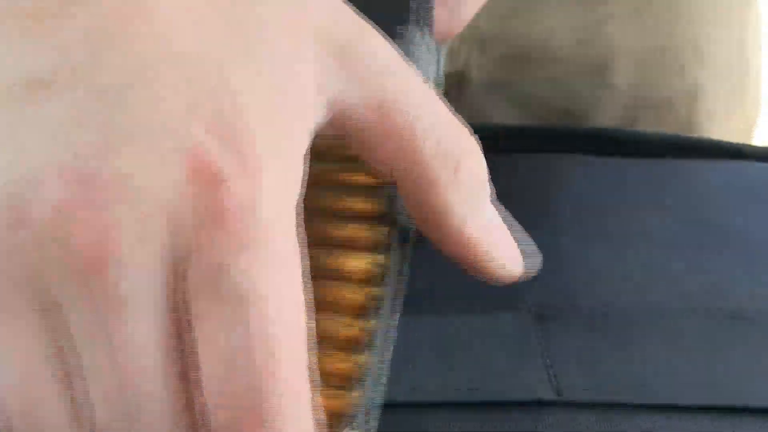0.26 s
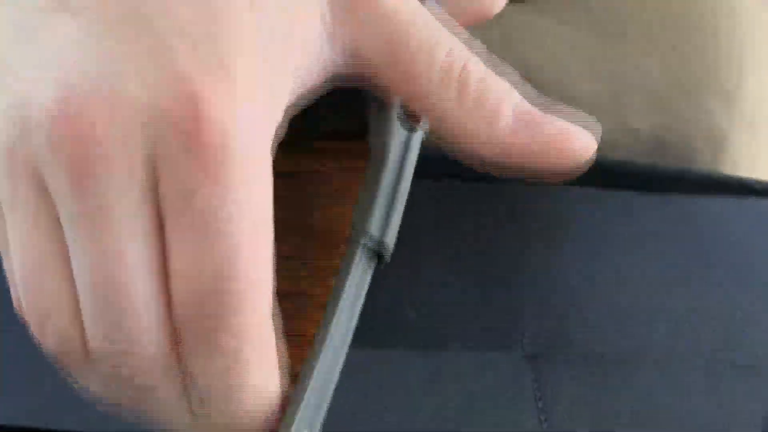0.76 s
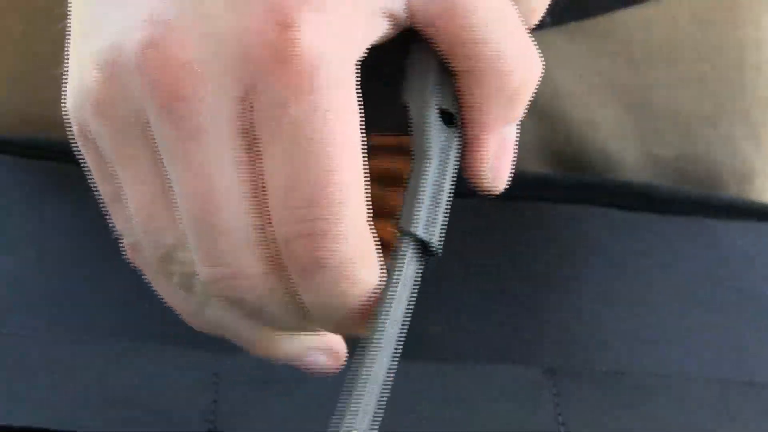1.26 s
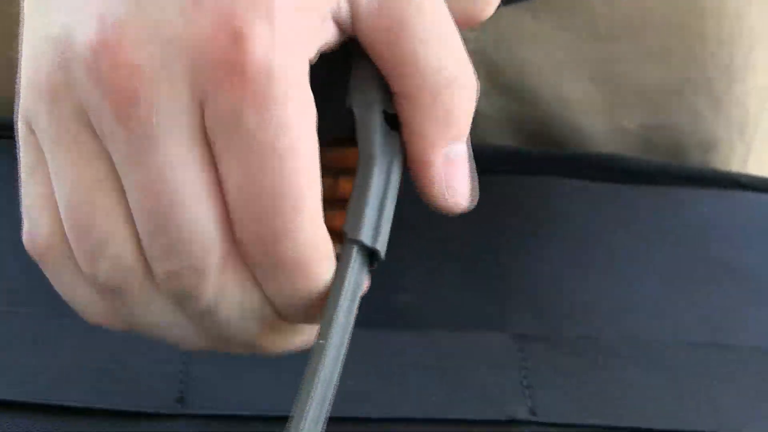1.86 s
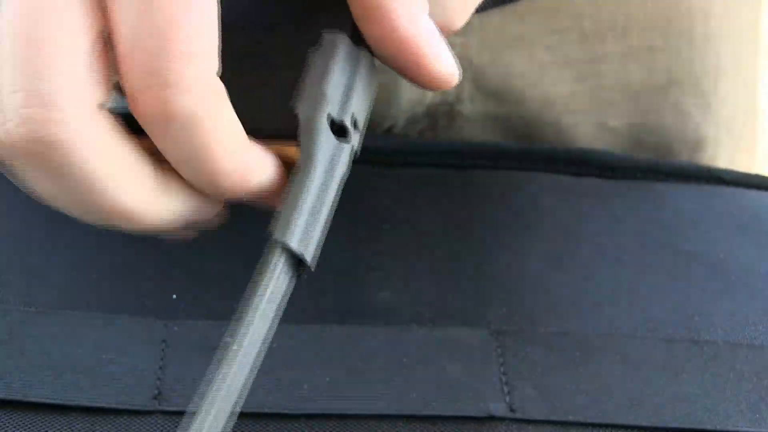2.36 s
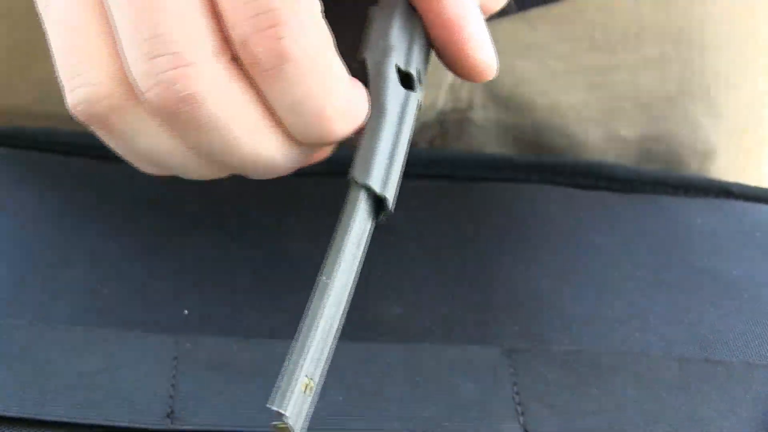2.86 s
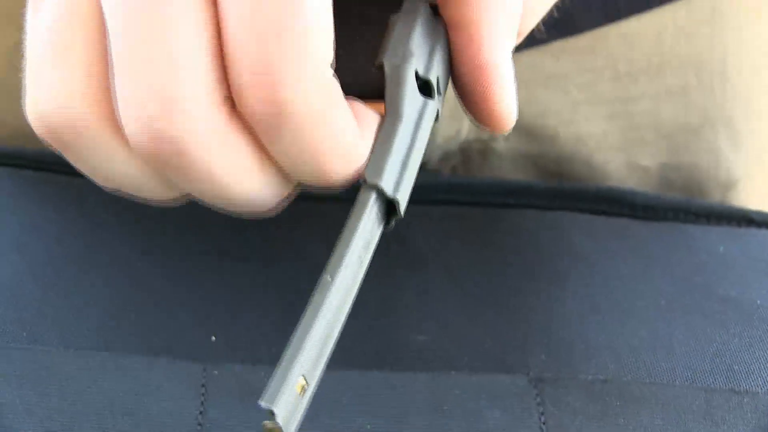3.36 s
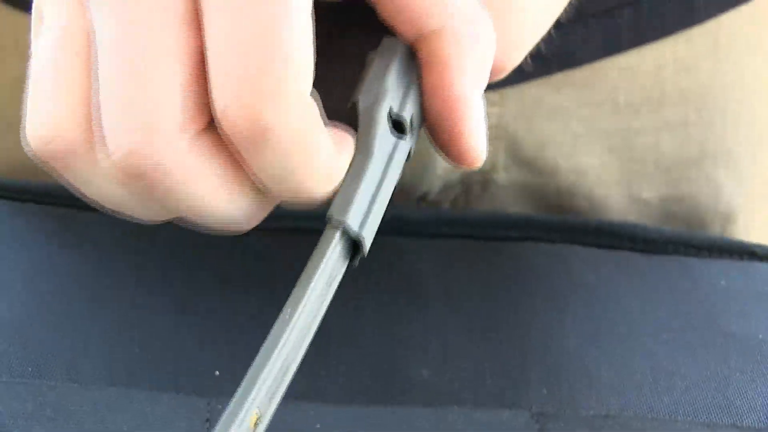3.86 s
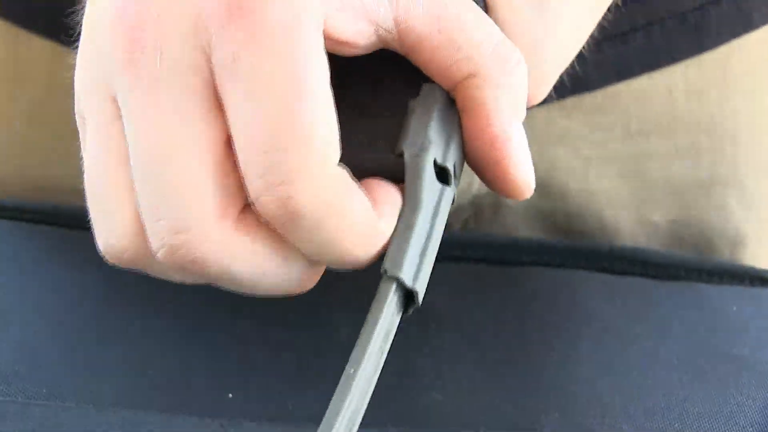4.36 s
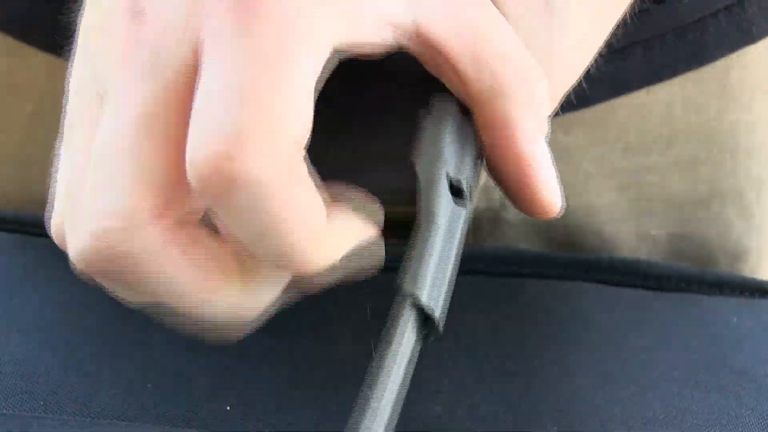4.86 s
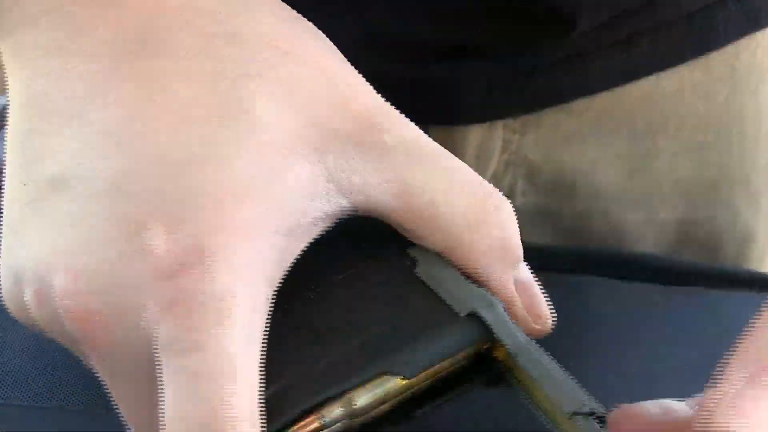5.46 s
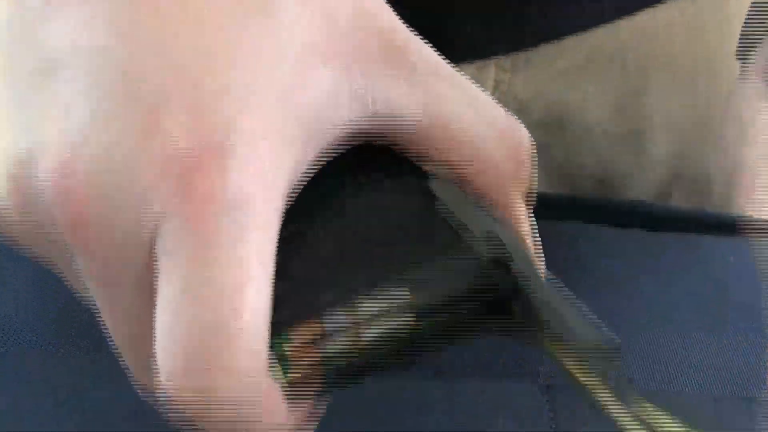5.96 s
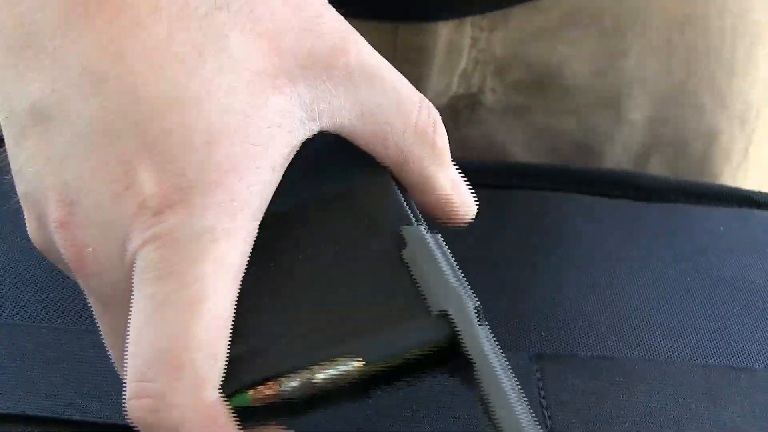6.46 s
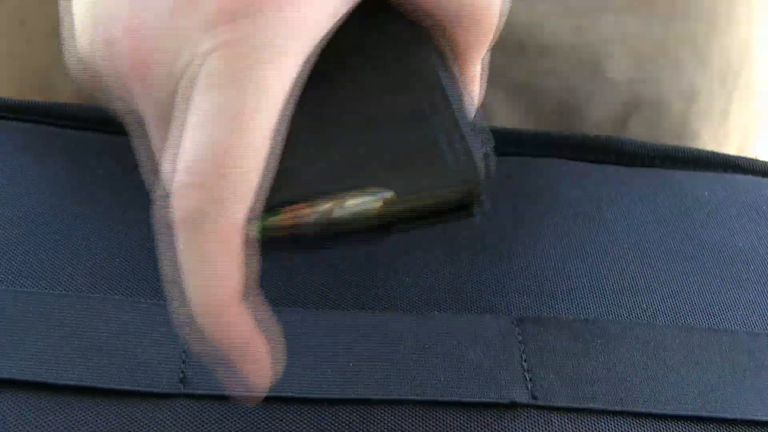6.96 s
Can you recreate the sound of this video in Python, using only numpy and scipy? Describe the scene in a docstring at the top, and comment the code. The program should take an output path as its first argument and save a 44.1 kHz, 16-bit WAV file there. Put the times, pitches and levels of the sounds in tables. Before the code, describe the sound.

Cartridges are pressed from a metal strip into a hollow plastic magazine, right by the microphone outdoors. Soft rubbing gives way to rapid hard clatter, then irregular snaps with small rattles, a brief spring creak and low padded knocks. It nearly falls silent, two strong clacks return, and the strip comes away with lighter clicks and scuffs. Thin bird whistles and light wind stay far behind, with no echo.

```python
"""First a faint tap and a rustle of skin and cloth, then hard clatters: outdoors, close to a camcorder's microphones,
brass cartridges are thumbed off a steel strip into a plastic magazine. Each slip is a burst of tiny random impacts
ringing the modes of shell, cases and hollow body. Filtered noise makes the rustle; a spring creaks in short ringing
slips, the magazine thumps a padded bag in low decaying tones. Far off, gliding tones make birds; shaped noise makes
light wind and microphone hiss."""
import sys
import numpy as np
from scipy import signal
from scipy.fft import rfft, irfft
from scipy.io import wavfile
from scipy.ndimage import uniform_filter1d

SR = 44100
rng = np.random.default_rng(int(sys.argv[2]) if len(sys.argv) > 2 else 0)


def file_out(sig):
    """Save sig as 16-bit WAV at sys.argv[1]."""
    # one column per channel
    cols = np.atleast_2d(sig).T
    # limit, then scale
    lim = np.clip(cols, -1, 1)
    pcm = np.round(lim * 32767).astype(np.int16)
    wavfile.write(sys.argv[1], SR, pcm)


N = 317520  # samples, 7.2 s


def undb(db):
    """Level in dB to amplitude."""
    return 10 ** (np.asarray(db) / 20)


def unit(x):
    """Scale to an RMS of 1."""
    return x / np.sqrt(np.mean(x ** 2))


def on_log(table, hz):
    """Read a spectrum between its points, along log frequency."""
    f, db = np.transpose(table)
    return np.interp(np.log(hz + 1), np.log(f), db)


def colour(x, gain):
    """Shape the spectrum of a full-length signal."""
    return irfft(rfft(x) * gain, N)


def walk(rate):
    """Random levels held 1 / rate s and smoothed twice, with an RMS of 1."""
    hold = int(SR / rate)
    steps = np.repeat(rng.standard_normal(N // hold + 1), hold)
    smooth = uniform_filter1d(uniform_filter1d(steps, hold), hold)
    return unit(smooth[:N])


def add(out, s, sound):
    """Mix a stereo sound in at s seconds."""
    i = int(s * SR)
    out[:, i:i + sound.shape[1]] += sound[:, :N - i]


def ring(modes, t, scatter_db=1.5, detune=0.029, crack_db=-22.0, tilt_db=0.):
    """Response to one tap: decaying modes, whose levels and pitches the grip shifts a little each time."""
    hz, db, t60 = np.array(modes).T[:, :, None]
    db = db + tilt_db * np.log2(hz / hz[0])  # tilt per octave above the first mode
    grip = rng.standard_normal((2, len(modes), 1))
    decay = np.exp(-np.log(1000) * t / t60)
    wave = np.sin(2 * np.pi * hz * (1 + detune * grip[0]) * t) * decay
    sign = (-1.) ** np.arange(len(modes))[:, None]
    strength = undb(db + scatter_db * grip[1]) / np.sqrt(t60)
    tap = np.sum(sign * strength * wave, axis=0)
    tap[0] += undb(crack_db) * np.sqrt(np.sum(tap ** 2))  # the bare crack of the contact
    # a small object radiates little outside the range of its modes
    edges = [.85 * hz.min(), min(1.15 * hz.max(), .45 * SR)]
    return signal.sosfilt(signal.butter(2, edges, "bandpass", fs=SR, output="sos"), tap)


# cartridge slips, close: (t/s, level/dB, hollow body level/dB and brass level/dB relative to it, fall by 40 dB/ms)
SLIPS = [(0.0403, -52.5, 2.5, 5, 46), (0.3977, -45, 4, 2.5, 16), (0.435, -50.5, -15, 0, 20),
         (0.451, -53, -15, -3, 10), (0.547, -51.5, -10, -12, 14), (0.668, -43.5, 0, 1, 9),
         (0.7483, -37.5, 5, 1, 15), (0.76, -25.5, -21, -2.5, 23), (0.7704, -16, -10.5, -4, 15),
         (0.7799, -11, -13, -3, 12), (0.7923, -17, -14.5, -7.5, 32), (0.7978, -8.5, -22.5, -3, 16.4),
         (0.8686, -40.5, -10, -10.5, 12), (0.8895, -39.5, -9.5, 0.5, 23), (0.9134, -23, -5.5, 1, 74),
         (0.9172, -10.5, -21, 0.5, 23), (0.942, -7.5, -26.5, -2, 10), (0.9622, -13.5, -15, 1, 20),
         (0.9805, -29, -25, -20.5, 45), (1.034, -22, -22, -9.5, 37), (1.039, -31, -2, -8.5, 13),
         (1.045, -29, -18.5, 4.5, 6.3), (1.0704, -37.5, -14.5, 5, 4.7), (1.0885, -7, -25.5, 1.5, 11.8),
         (1.1963, -49, -18, -12, 31), (1.2226, -45.5, -10, -25, 19), (1.5147, -55, -1, -18, 11),
         (1.5463, -33, -17.5, -7, 8.5), (1.5694, -18, -11.5, -12, 12.2), (1.5914, -38.5, 2.5, 6, 31),
         (1.611, -40.5, -12.5, -13.5, 11), (1.7232, -57, -14, 5, 13), (1.8211, -46, -5, -20, 3.7),
         (1.845, -48, -6, -14, 8), (1.9007, -15.5, -13, -6, 6.6), (1.989, -48, -14, -5, 12),
         (2.017, -26, -4.5, -1.5, 11), (2.027, -26, -15, -9, 20), (2.0493, -8.5, -24.5, 3.5, 8.1),
         (2.0556, -21.5, -6.5, -7.5, 35), (2.069, -8, -22.5, -5, 2.6), (2.079, -18.5, -16.5, 0.5, 44),
         (2.1696, -45.5, -1, -6, 47), (2.188, -43.5, -4, -10, 15), (2.237, -56, 9, -6, 11),
         (2.3002, -47.5, 4, -18, 12), (2.33, -21.5, 0.5, -9.5, 38), (2.337, -23, -8, 1, 10),
         (2.3482, -33, -22, -19, 5.3), (2.3632, -40, -7, -13.5, 12), (2.825, -40.5, 7.5, -17, 25),
         (2.8364, -19, -54, -14, 14), (2.845, -33, 9, -8.5, 9.4), (2.8486, -15, -14, -6.5, 17),
         (2.866, -32.5, -27.5, -14.5, 12), (2.983, -38.5, -11, -3, 8.9), (3.2329, -38, -23.5, -11, 4.2),
         (3.2656, -28.5, -3, -8.5, 120), (3.277, -13.5, -7.5, -7, 9.5), (3.3028, -26.5, -9.5, -10, 26),
         (3.3068, -22.5, -8, -8.5, 9.2), (3.3153, -30.5, -18, -2.5, 14), (3.357, -51.5, 0, 3, 22),
         (3.522, -37, -5, -12, 61), (3.5415, -12.5, -6.5, 1, 25.5), (3.547, -13, -12.5, -9.5, 6.1),
         (3.606, -43, -16, -9.5, 73), (3.6566, -55, -14, -10, 9.9), (3.675, -45.5, -24, 7, 7.5),
         (3.7018, -44, -4.5, -9, 15), (3.7175, -39.5, -5.5, -6, 16), (3.7283, -47.5, -3, -10, 5.8),
         (3.7404, -51, -3, -17, 38), (3.7546, -52.5, -14, -9, 5.5), (3.7928, -58.5, -5, -7, 3.7),
         (3.8671, -52, 2, 10, 13), (3.8752, -53.5, 1, 1, 9.3), (3.897, -59, -10, -6, 34),
         (3.9706, -58, 1, -9, 16), (3.9873, -62, 12, -1, 10.8), (4.158, -61.5, -10, -4, 8),
         (4.265, -64.5, -9, -8, 12), (4.3339, -59, 0, -3, 15), (4.572, -53.5, 1, -6, 28),
         (4.6942, -48.5, 1, -24, 23), (4.7578, -19, -16.5, -5, 7), (4.7639, -10, -14.5, 4, 13.5),
         (4.776, -24.5, -39, -11, 38), (4.7985, -39, -37, -11, 37), (4.8784, -40.5, -9, -21, 42),
         (4.9094, -37, -9, -15, 4), (4.9333, -20.5, -7, -4.5, 12), (4.9448, -12, -14.5, 2.5, 16),
         (4.9546, -24, -23, -12, 36), (4.9802, -36, -13, -0.5, 36), (5.347, -41.5, -28, -5.5, 8.9),
         (5.6337, -55, -1.5, 2.5, 90), (6.0687, -49, -15, 2, 65), (6.0816, -14.5, -18.5, 5, 18.4),
         (6.094, -32, -22, 13, 32), (6.1239, -34.5, 0, 11.5, 15), (6.278, -50.5, -25, -2, 15),
         (6.4077, -58, -7, -7.5, 20), (6.5108, -59, -8, 18, 3.6), (6.5332, -44, 12, 1, 27),
         (6.627, -62, 16, 2, 9), (6.96, -22, -3.5, 6.5, 13.6), (6.976, -52, -29, -16, 23)]
# the grip frees or damps the lower shell: (t/s, level/dB)
GRIP_ON_SHELL = [(0., -0.5), (1.05, -2.5), (1.2, 2.5), (1.57, 4), (1.9, -4.5), (2.1, 2), (2.33, 4),
                 (2.85, 0), (3.0, -7), (3.3, -2.5), (3.55, 5.5), (3.68, -2), (3.75, 5.5), (4.7, -0.5),
                 (4.95, -1.), (5.35, -14.5), (6.08, 2.), (6.28, -11), (6.5, 4.5), (6.96, 13.5)]
# modes of the hollow body, lower shell, upper shell and brass cases: (f/Hz, level/dB, t60/s)
HOLLOW_MODES = [(340, -19.5, 0.019), (424.6, 4.5, 0.016), (534, 8, 0.0067), (635.3, 6.5, 0.019)]
SHELL_LOW_MODES = [(942, -9, 0.011), (1246, -1, 0.012), (1280, -0.5, 0.012), (1620, 0, .012),
                   (1728, -2, 0.017), (1904, -3.5, .012)]
SHELL_HIGH_MODES = [(2117, -3.5, 0.0098), (2680, 1.5, 0.0066), (2718, 0.5, 0.0078), (3033, -3, 0.0077),
                    (3490, -4, 0.0076), (3810, -4.5, .008), (4305, -4.5, .008)]
BRASS_MODES = [(4476, 1.5, 0.0063), (4974, 1, 0.0045), (5760, 1, 0.0037), (6497, 1.5, 0.0038),
               (6906, 1, 0.0052), (7806, -4.5, 0.0091), (8270, -10, 0.005), (8680, -9, 0.035),
               (9270, -8.5, 0.0029), (10990, -8, 0.001), (13700, -20, 0.004)]
# harder slips build up longer and favour the upper shell: value at 0 dB, and change per dB of level
RISE_MS, RISE_MS_PER_DB = 2.4, 0.09  # a third of the build-up
LOW_SHELL_DB, LOW_SHELL_PER_DB = -5.5, -0.1673


def clicks(side_db=-12.5, rattle_db=-19.0, rattle_s=0.071, spread_db=6.0, swell_db=15.5, snap_db=19.5,
           lead_db=17.5, jolt_db=-45.5, jolt_s=.006, dulling=0.3):
    """Every slip: a clatter of impacts that swells, dies fast and leaves a faint rattle of loose cases."""
    out, t = np.zeros((2, N)), np.arange(int(SR / 8)) / SR
    for s, db, hollow_db, brass_db, t40_ms in SLIPS:
        rise = max(RISE_MS + RISE_MS_PER_DB * db, .2) / 1000
        build_s = 3 * rise
        low_db = LOW_SHELL_DB + LOW_SHELL_PER_DB * db + np.interp(s, *np.transpose(GRIP_ON_SHELL))
        after = np.maximum(t - build_s, 0)  # seconds since the landing
        before = np.minimum(t / build_s, 1) - 1  # -1 at the start, 0 from the landing on
        clatter = np.exp(-np.log(100) * after / (t40_ms / 1000))
        rattle = undb(rattle_db) * np.exp(-np.log(100) * after / rattle_s)
        push = undb(swell_db * before) * (clatter + rattle)
        # impacts differ widely in force; the second row reaches the two microphone ports unalike
        force = undb(spread_db * rng.standard_normal(len(t)))
        taps = push * rng.standard_normal((2, len(t))) * force
        taps[:, int(build_s * SR)] = undb(lead_db)  # the landing itself, set strong
        hard = taps * undb(snap_db * before)  # metal meets metal only at the end of the slip
        # (impacts, modes, level/dB, extra side level/dB): short waves differ more between the ports
        parts = ((hard, SHELL_HIGH_MODES, 0, 0), (taps, HOLLOW_MODES, hollow_db, -4.),
                 (taps, SHELL_LOW_MODES, low_db, -1.5), (hard, BRASS_MODES, brass_db, 2.5))
        sound = 0
        for drive, modes, part_db, apart_db in parts:
            # a part that is struck more softly loses its top modes first
            response = ring(modes, t[:len(t) // 3], tilt_db=dulling * min(part_db, 0))
            part = signal.fftconvolve(drive, response[None], axes=1)
            power = uniform_filter1d(part ** 2, SR // 500, axis=1)  # over 2 ms
            loudest = np.sqrt(power.max(axis=1, keepdims=True))
            part = undb(db + part_db) * part / loudest
            sound = sound + part[0] + undb(side_db + apart_db) * np.outer([1, -1], part[1])
        # the blow also shakes the bag and the camera as a dull jolt
        x = after / jolt_s
        sound[:, :len(t)] += undb(db + jolt_db) * x * np.exp(1 - x) * np.cos(x)
        add(out, s - 2.5 * rise, sound)
    return out


# creaks of the magazine spring: (t/s, peak level/dB)
SPRING_CREAKS = [(3.0303, -32), (3.05, -32), (3.068, -28.5), (3.0825, -27.5), (3.1054, -32), (3.1153, -48),
                 (3.121, -46)]
# modes of the spring: (f/Hz, level/dB, t60/s)
SPRING_MODES = [(533, -9, 0.0081), (1020, -12, 0.0061), (1680, -5.5, 0.013), (3320, -3.5, .006),
                (3690, -2, .006), (5370, -17.5, 0.0044), (6890, -19.5, .004)]


def creaks(slip_s=.0007):
    """A coil sticks and lets go: one short, rough slip rings the same few modes each time."""
    out, t = np.zeros((2, N)), np.arange(SR // 30) / SR
    for s, db in SPRING_CREAKS:
        roughness = 1 + 0.55 * rng.standard_normal(len(t))
        slip = roughness * rng.standard_normal(len(t)) * np.exp(-t / slip_s)
        tick = signal.fftconvolve(slip, ring(SPRING_MODES, t, detune=0.006, crack_db=-18))
        add(out, s, undb(db) * np.outer([1, 1], tick / np.abs(tick).max()))
    return out


# thumps on the padded bag: (t/s, peak level/dB, f/Hz, t60/s)
BAG_BUMPS = [(0.454, -43, 230, 0.053), (0.51, -40, 340, 0.024), (0.665, -38.5, 393, 0.089),
             (1.263, -39.5, 287, 0.039), (1.279, -36, 284, 0.038), (1.299, -43.5, 301, 0.086),
             (1.434, -33, 289, 0.028), (1.448, -34, 287, 0.032), (1.464, -35, 288, 0.035),
             (1.525, -29, 244, 0.013), (1.586, -24, 402, 0.032), (2.334, -22.5, 378, 0.04),
             (3.307, -23.5, 423, 0.024), (3.872, -45, 136, 0.025), (4.945, -15.5, 432, 0.013),
             (6.124, -31, 171, 0.022), (6.537, -17, 272, 0.02), (6.549, -42, 147, 0.022),
             (6.583, -36.5, 175, 0.091), (6.626, -26.5, 240, 0.045), (6.654, -37, 172, 0.043),
             (6.677, -29, 180, 0.025)]


def bumps(push_s=0.0021):
    """The magazine and knuckles thump the padded bag: a soft push into one low, short mode."""
    out, t = np.zeros((2, N)), np.arange(SR // 10) / SR
    for s, db, hz, t60 in BAG_BUMPS:
        decay = np.exp(-np.log(1000) * t / t60)
        thump = np.sin(2 * np.pi * hz * t) * decay * (1 - np.exp(-t / push_s))
        add(out, s, -undb(db) * np.outer([1, 1], thump / np.abs(thump).max()))
    return out


# hands resting and shifting on cloth and plastic: (t/s, level/dB, tilt from band to band/dB)
HAND_RUB = [(0.0, -63.5, 1.8), (0.15, -49.5, 2), (0.5, -59, -1.1), (0.75, -55.5, -2.4), (0.95, -57.5, -0.5),
            (1.12, -43.5, 1.5), (1.22, -60, -2.5), (1.8, -63.5, -1), (2.2, -54.5, -1), (2.6, -67, -1),
            (3.501, -61.5, -2), (4.4, -71.5, -4), (4.88, -57.5, 1.2), (5.12, -61, -0.8), (5.37, -57.5, .4),
            (5.7, -69.5, -1.1), (6.2, -60, -1.5), (7.2, -65.5, -2)]
# short drags of skin or brass: (fullest t/s, length/s, level/dB, tilt from band to band/dB)
SHORT_DRAGS = [(0.197, 0.069, -50, 8.5), (0.246, .085, -50.5, 7), (0.516, 0.09, -51.5, -2),
               (0.682, 0.096, -59, -7), (0.909, 0.072, -40.5, -1.8), (1.022, .044, -44.5, 0),
               (1.217, 0.037, -55, -6.), (1.286, 0.055, -65, -20), (1.388, 0.059, -66.5, 11.5),
               (1.453, 0.046, -48.5, -11.5), (1.532, 0.12, -51.5, -7.5), (1.592, 0.13, -41.5, -4.3),
               (1.76, 0.061, -74.5, 17), (1.9, 0.092, -50.5, -4.5), (2.013, 0.049, -52, -2),
               (2.12, 0.057, -46, 2), (2.331, 0.041, -52, 1), (2.565, 0.073, -57, -1),
               (2.885, 0.04, -47, -3), (3.013, 0.036, -56.5, -1.5), (3.269, 0.034, -43, -1),
               (3.592, 0.051, -55, 0), (3.609, .04, -54, -4.5), (4.022, 0.04, -58.5, 7),
               (4.921, 0.064, -37.5, -2), (5.184, 0.14, -59, 5.), (5.332, 0.14, -70.5, 14.5),
               (5.459, 0.095, -52, 8), (5.943, 0.054, -63, 0), (6.15, 0.035, -59, 7),
               (6.496, .075, -48.5, -9.5), (6.502, 0.065, -54.5, 9.5), (6.557, 0.095, -53.5, -9),
               (6.812, 0.075, -50.5, 0.5), (6.855, 0.081, -54, 2.5), (6.962, 0.066, -37, 6.5),
               (6.98, 0.066, -50, 2), (7.167, 0.37, -57, 1.5)]
# friction bands: (low f/Hz, high f/Hz, level of the resting rub/dB)
FRICTION_BANDS = [(107, 760, -1.5), (860, 2070, -3), (2000, 4280, -1.5), (4420, 22000, -1.5)]
# spectrum of skin friction: (f/Hz, level/dB per Hz)
SKIN_SPECTRUM = [(59, -31.5), (100, -10.5), (302, -3.5), (768, -6), (930, -1), (1760, -5), (2690, -6.5),
                 (4770, -11.5), (7610, -17), (13800, -30), (16000, -36.5)]
SCUFF_RISE, SCUFF_ARCH_DB = 0.53, 7  # share of the length; how far the outer bands fall below the middle ones
CRACKLE = 1.2  # extra force of a catch


def rub(grain_db=0.5, flutter_db=2.5, side_db=-10.5):
    """Skin drags over cloth and plastic: grainy friction whose colour follows the hands."""
    s, rest_db, rest_tilt_db = np.transpose(HAND_RUB)
    t, hz, out = np.arange(N) / SR, np.arange(N // 2 + 1) * SR / N, 0
    grit = undb(grain_db * walk(900) + 2.0 * walk(150))
    grit = grit * (1 + CRACKLE * np.maximum(walk(420) - 1.5, 0))  # ridges of skin catch now and then
    for k, (lo_hz, hi_hz, band_db) in enumerate(FRICTION_BANDS):
        place = k - 3 / 2  # bands above the middle
        band = undb(on_log(SKIN_SPECTRUM, hz)) / (1 + (lo_hz / (hz + 1)) ** 6) / (1 + (hz / hi_hz) ** 6)
        mid, side = (unit(colour(grit * rng.standard_normal(N), band)) for _ in range(2))
        force = undb(np.interp(t, s, rest_db + place * rest_tilt_db + band_db))
        for full, length, db, tilt_db in SHORT_DRAGS:
            rise, fall = SCUFF_RISE * length, (1 - SCUFF_RISE) * length
            span = slice(int((full - rise) * SR), int((full + fall) * SR))
            drag_db = db + place * tilt_db - SCUFF_ARCH_DB * place ** 2 / 2
            force[span] += undb(drag_db) * np.interp(t[span] - full, [-rise, 0, fall], [0, 1, 0])
        stereo = mid + undb(side_db) * np.outer([1, -1], side)
        out = out + force * undb(flutter_db * walk(45)) * stereo
    return out


# far whistles: (t/s, length/s, start f/Hz, end f/Hz, level/dB, trill depth 0-1, hoarseness as RMS pitch wander/Hz)
BIRD_CALLS = [(2.771, .06, 2890, 2930, -61.5, 0.07, 30), (3.445, .025, 2910, 3300, -58.5, 0.1, 40),
              (3.454, 0.038, 3320, 2900, -61, 0., 40), (3.823, 0.027, 3650, 4500, -60, 0., 56),
              (3.885, 0.04, 3500, 4550, -62, 0.1, 63), (4.978, 0.27, 5120, 5060, -56.5, 0.1, 9),
              (5.545, 0.034, 5740, 4840, -55, 0.3, 69), (5.63, 0.14, 5200, 5100, -58.5, 0.74, 63),
              (5.725, 0.13, 5080, 5050, -55, 0.7, 46), (5.905, 0.19, 5050, 1900, -58, 0.2, 138),
              (5.99, 0.11, 4600, 3860, -57, 0.3, 49), (6.31, 0.056, 4550, 3500, -60, 0.2, 70),
              (6.58, 0.085, 3200, 2530, -51.5, 0.3, 74), (6.653, 0.045, 2570, 3390, -55.5, 0.3, 105),
              (6.683, 0.062, 3240, 2700, -53, 0.1, 116), (6.705, 0.027, 1580, 2540, -51.5, 0.15, 58),
              (7.068, 0.046, 11300, 10000, -64, 0., 60), (7.077, 0.093, 13400, 11800, -70.5, 0., 80)]


def birds(trill_hz=126.0, flick_hz=500.):
    """Far whistles: gliding tones blurred by the air; a trill is a row of quick upward flicks."""
    out = np.zeros((2, N))
    waver, flicker = walk(990), undb(3. * walk(110))
    for start, length, hz0, hz1, db, trill, hoarse_hz in BIRD_CALLS:
        i, n = int(start * SR), int(length * SR)
        beat = trill_hz * np.arange(n) / SR % 1
        glide = np.linspace(hz0, hz1, n)
        hz = glide + hoarse_hz * waver[i:i + n] + flick_hz * trill * (beat - .5)
        swell = np.sin(np.linspace(0, np.pi, n)) ** 0.43 * (1 - trill * np.cos(2 * np.pi * beat))
        tone = swell * flicker[i:i + n] * np.sin(2 * np.pi * np.cumsum(hz) / SR)
        add(out, start, undb(db + np.array([[1.5], [-1.5]])) * tone)  # a little louder on the left
    return out


# spectrum of wind and microphone hiss: (f/Hz, level/dB per Hz)
AIR_SPECTRUM = [(18, -48.5), (30, -19), (179, 3), (252, -10), (499, -7.5), (913, -10), (7090, -19.5),
                (13300, -25), (16000, -26)]
# stereo width of the air: (f/Hz, side minus mid level/dB)
AIR_WIDTH = [(60, -7), (110, -15), (200, -1.5), (380, 4.5), (700, 0.5), (1290, -1.5), (2380, -3),
             (4400, -2), (8120, -6), (15000, -3)]
AIR_DB = -60.0  # mid level before the wind moves it


def air(gust_db=3.9):
    """Light wind wavers in the bass, steady hiss above; the wind is partly unrelated left and right."""
    hz = np.arange(N // 2 + 1) * SR / N
    gain, low = undb(on_log(AIR_SPECTRUM, hz)), 1 / (1 + (hz / 700) ** 2)
    side_gain = undb(on_log(AIR_WIDTH, hz))
    both = np.array([colour(rng.standard_normal(N), gain * g) for g in (1, side_gain)])
    wind = np.array([colour(c, low) for c in both])
    mid, side = (both + wind * (undb(gust_db * walk(5.2)) - 1)) / both[0].std()
    return undb(AIR_DB) * (mid + np.outer([1, -1], side))


def scene():
    """All sources together, from the hands outward."""
    return clicks() + creaks() + bumps() + rub() + birds() + air()


TOP_HZ = 15900


def record(dry, release_s=0.16, knee_db=-28.0, squeeze=0.23):
    """Gain control ducks after loud hits, peaks are rounded at full scale and the top is cut."""
    keep = np.exp(-1 / (release_s * SR))
    loud = signal.lfilter([1 - keep], [1, -keep], np.abs(dry).mean(axis=0))
    ducked = dry / (1 + loud / undb(knee_db)) ** squeeze
    soft = ducked / (1 + np.abs(ducked) ** 4) ** (1 / 4)
    return signal.sosfilt(signal.ellip(10, .2, 80, TOP_HZ, fs=SR, output="sos"), soft)


dry = scene()
out = record(dry)
file_out(out)
```